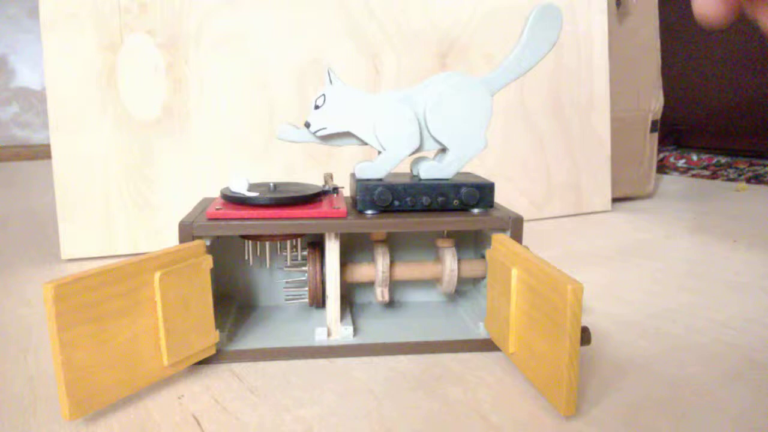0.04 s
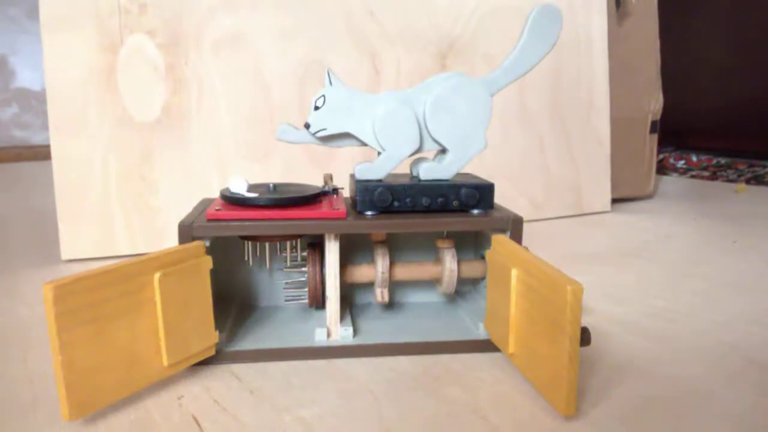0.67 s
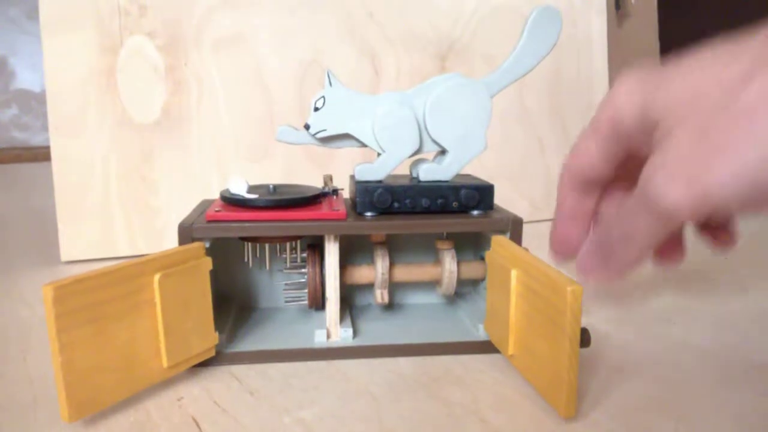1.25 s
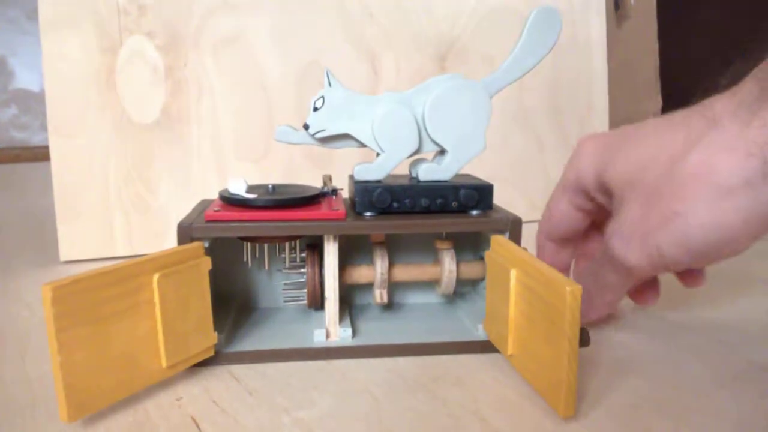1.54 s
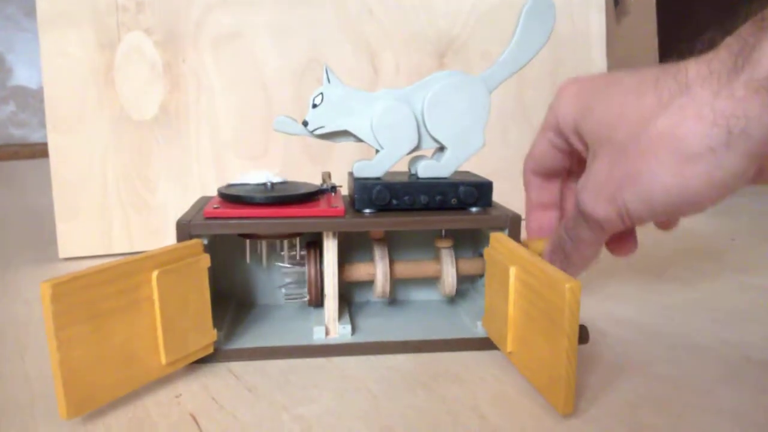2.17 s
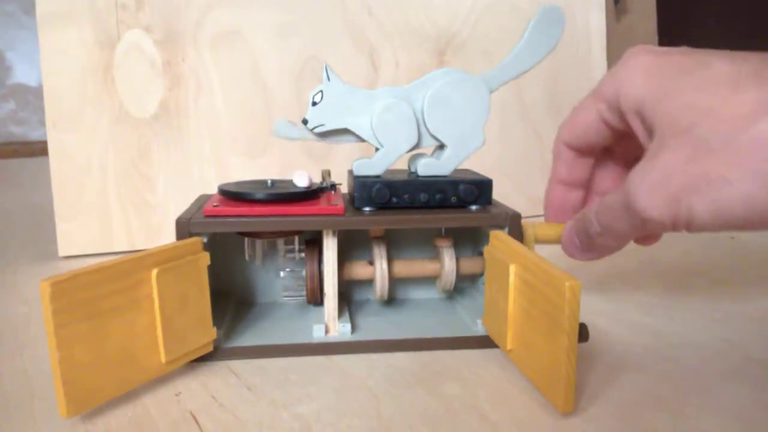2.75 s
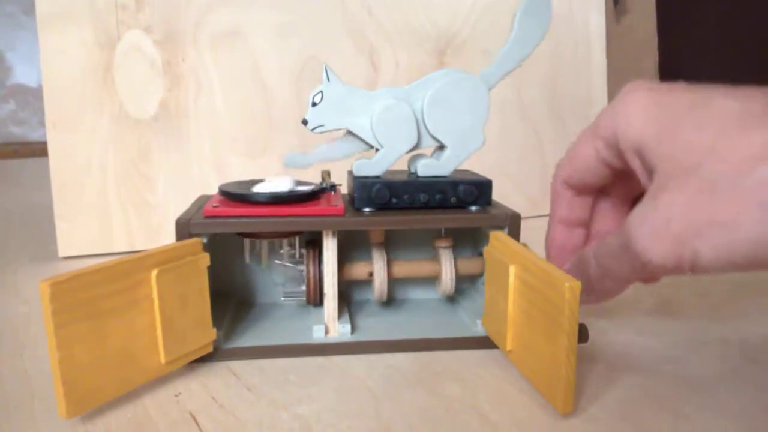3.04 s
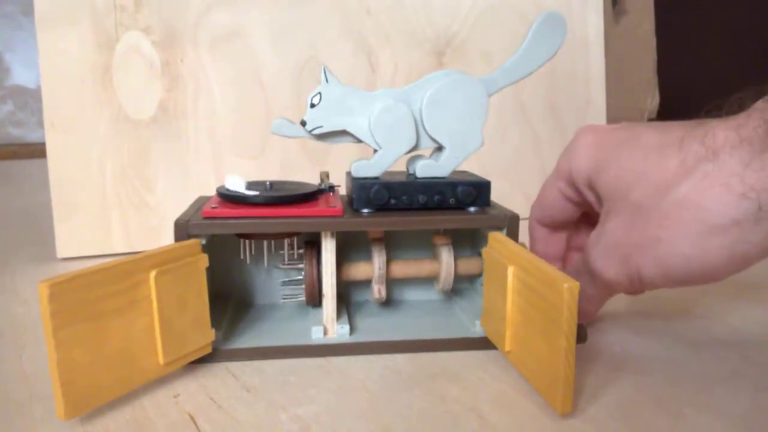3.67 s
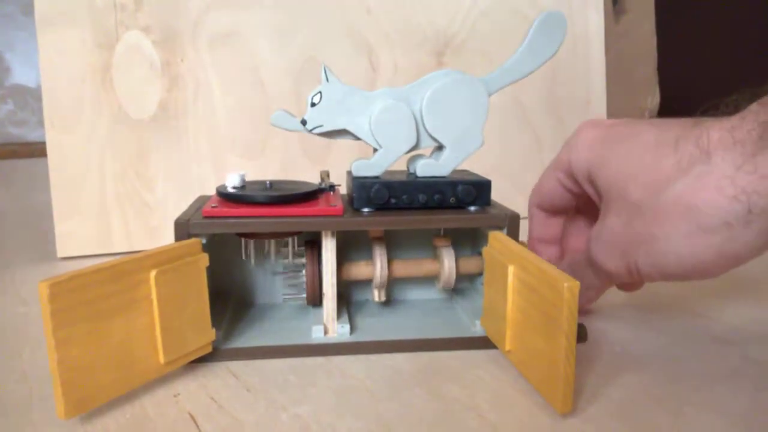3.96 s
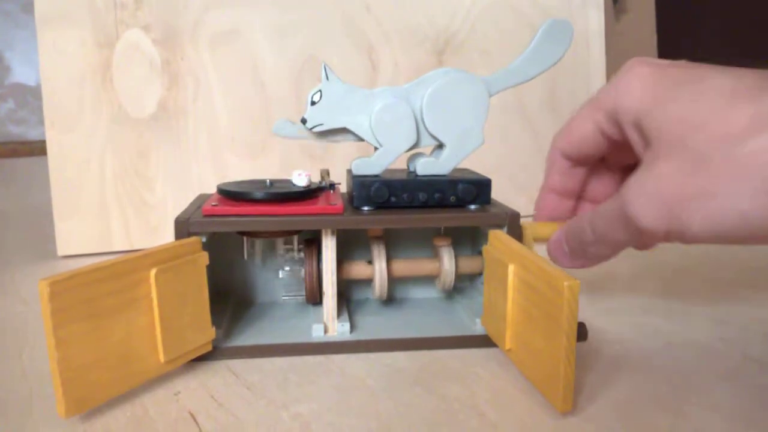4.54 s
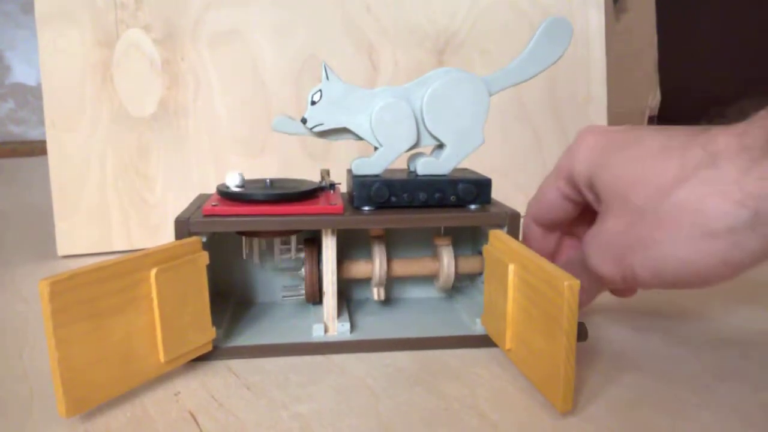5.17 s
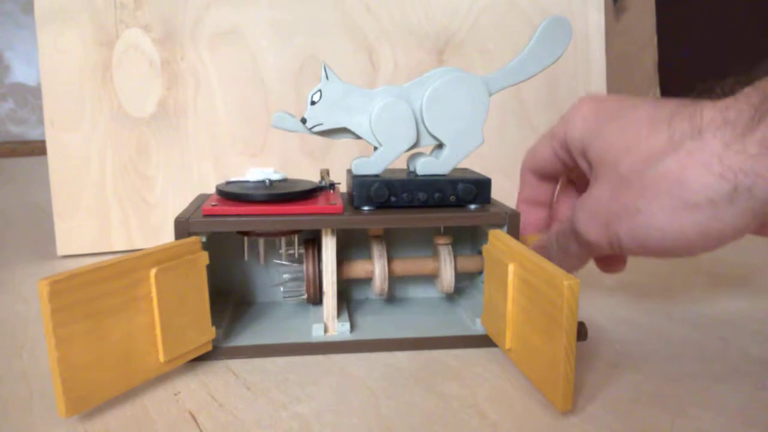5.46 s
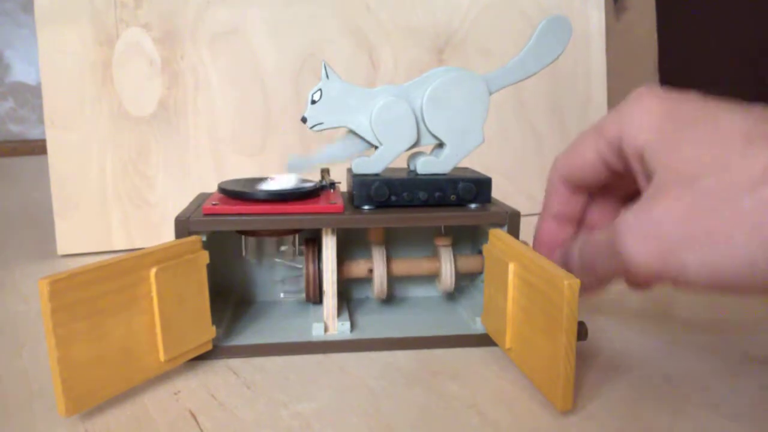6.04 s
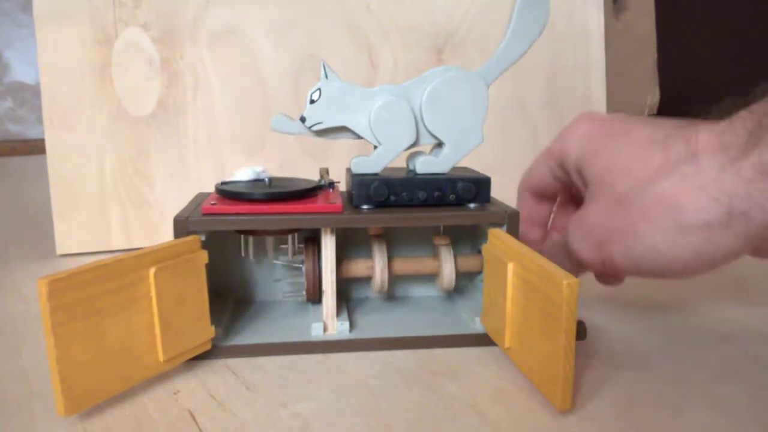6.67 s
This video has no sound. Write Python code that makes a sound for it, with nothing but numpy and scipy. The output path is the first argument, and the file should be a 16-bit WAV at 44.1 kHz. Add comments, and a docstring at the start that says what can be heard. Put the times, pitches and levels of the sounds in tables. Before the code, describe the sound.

A hand-cranked wooden toy grinds and rattles with small knocks and three sharp clacks in a quiet room.

```python
"""A wooden automaton is cranked by hand on a table in a small, quiet room.
Stick-slip friction makes its shaft grind and hiss, and its pins rattle, louder with greater effort.
Cams knock and scrape, exciting the damped modes of the open case; once a turn a cam lets the figure's
arm drop with a hard, bouncing clack. The table thuds softly and near surfaces add a short tail.
Faint room noise and a very faint, high double tick lie underneath."""
import sys
import numpy as np
from scipy import signal
from scipy.fft import rfft, irfft
from scipy.io import wavfile
from scipy.ndimage import uniform_filter1d

SR = 44100
rng = np.random.default_rng(int(sys.argv[2]) if len(sys.argv) > 2 else 0)


def store_pcm(level_fs):
    """Save levels as 16-bit WAV."""
    pcm = np.round(np.clip(level_fs, -1, 1) * 32767).astype(np.int16)
    wavfile.write(sys.argv[1], SR, np.atleast_2d(pcm).T)


N = 300321
T = np.arange(N) / SR
RING_T = T[:8192]  # time axis of one impact

# spectrum of the background noise (frequency [Hz], level [dB])
AIR_SPECTRUM = [(12, -37), (20, 1), (79, -9.5), (150, -21), (172, -24.5), (319, -22.5), (410, -28.5),
                (472, -23.5), (558, -29.5), (780, -28), (1370, -34), (5080, -32.5), (8890, -36.5),
                (11100, -37), (16000, -39.5)]
# effort on the crank, expressed as the level of the grinding (time [s], level [dB])
CRANK_EFFORT = [(1.62, -82), (1.86, -73), (2.03, -49), (2.44, -61), (2.67, -67), (2.76, -49.5),
                (2.9, -53.5), (3.3, -53), (3.56, -71), (3.74, -74.5), (3.91, -59.5), (4.03, -62.5),
                (4.12, -50), (4.4, -54), (4.5, -56.5), (4.7, -48), (4.86, -57), (5.07, -47.5),
                (5.15, -58.5), (5.39, -53.5), (5.53, -62.5), (5.68, -55), (6.01, -55.5), (6.26, -49),
                (6.47, -55), (6.68, -49.5), (6.81, -50)]
# modes of the wooden case (frequency [Hz], bandwidth [Hz], level [dB])
CASE_MODES = [(289.6, 97, -17.5), (440.3, 54, -2), (503.3, 87.6, -2), (575.5, 46, -6.5), (745, 72, -4),
              (842, 145.5, 0), (913.7, 92, 2), (1134, 320, -16), (1241, 80, -5), (1331.6, 36, -4),
              (1569, 53, -9), (1816, 34, -9), (1942, 104, -7.5), (2240, 134, -21.5)]
# modes of the small hard parts: wires, pins, arm (frequency [Hz], bandwidth [Hz], level [dB])
PART_MODES = [(2770, 160, -10.5), (3410, 160, -1), (3924, 100, -21), (3970, 140, -8), (4450, 130, 2),
              (4684, 180, -8), (6320, 570, -10.5), (7000, 58, -14)]
# spectrum of fine rubbing grit (frequency [Hz], level [dB])
GRIT_SPECTRUM = [(300, -11.5), (1700, 6.5), (2400, -3), (3900, 0.5), (5200, -9), (7000, -5.5), (8500, -17),
                 (11000, -10.5), (15000, -34.5)]
# a follower rides up its cam (time [s], duration [s], level [dB])
CAM_SCRAPES = [(1.634, .04, -63.5), (1.908, 0.307, -60.5), (2.315, 0.023, -63), (2.628, 0.02, -60),
               (2.755, 0.071, -52.5), (3.242, 0.038, -70.5), (4.11, 0.13, -60), (4.207, 0.16, -55),
               (4.364, 0.049, -45.5), (4.56, 0.069, -49), (4.68, 0.02, -47.5), (4.9, 0.048, -54.5),
               (5.097, 0.019, -67.5), (5.316, 0.084, -62), (5.668, 0.026, -54), (5.788, 0.022, -60.5),
               (5.864, 0.028, -53), (5.93, 0.03, -51), (6.044, 0.036, -55), (6.376, 0.073, -52),
               (6.642, 0.078, -55)]
# louder knocks of pins and cams (time [s], level [dB], nominal pitch [Hz], treble share [dB])
CAM_KNOCKS = [(1.634, -41.5, 910, -22), (1.663, -40, 885, -28), (1.684, -42, 960, -38),
              (1.793, -44.5, 940, -28), (2.008, -40.5, 835, -22), (2.093, -39.5, 945, -23),
              (2.179, -38.5, 890, -16), (2.495, -41.5, 820, -24), (2.71, -40, 900, -14.5),
              (2.866, -42, 800, -40), (2.936, -39, 910, -34), (3.106, -33, 995, -29.5),
              (3.18, -43, 850, -28), (3.268, -42, 1100, -29), (3.434, -47.5, 860, -21),
              (3.69, -52.5, 980, -18), (3.569, -52, 910, -25), (3.778, -34.5, 910, -16),
              (3.883, -46, 930, -35), (3.989, -45.5, 920, -22), (4.263, -41, 940, -33),
              (4.307, -41.5, 805, -12), (4.329, -29, 844, -24), (4.34, -32.5, 920, -22),
              (4.672, -35, 1660, -24.5), (4.787, -34, 955, -13), (4.818, -40, 840, -19),
              (4.899, -33.5, 896, -36), (5.067, -39.5, 1030, -48), (5.188, -36, 900, -26.5),
              (5.413, -39, 960, -33), (5.67, -38, 1040, -23), (5.682, -35, 840, -20),
              (6.039, -40, 815, -31), (6.246, -38.5, 840, -38), (6.303, -35.5, 1276, -20.5),
              (6.382, -31, 980, -23), (6.536, -34, 963, -33), (6.611, -39.5, 880, -10.5),
              (6.618, -31.5, 820, -41), (6.665, -34.5, 940, -21)]
# spectrum of the crack of a hard contact (frequency [Hz], level [dB])
CRACK_SPECTRUM = [(3000, -46), (4500, -7), (6000, -8.5), (8000, -5), (9500, -0.5), (10500, 6), (11600, 0.5),
                  (12800, -9), (13600, 1), (16000, -18.5)]
# spectrum of the dense, short ringing of the small parts (frequency [Hz], level [dB])
CLINK_SPECTRUM = [(900, -47.5), (1950, 5.5), (2400, -16.5), (2800, 0), (3300, -20), (3900, 6), (4650, 0.5),
                  (5300, -9), (7000, -2), (9000, -19)]
# dull bumps through the table (time [s], duration [s], level [dB])
TABLE_BUMPS = [(1.76, 0.087, -58.5), (3.53, 0.093, -51.5), (3.80, 0.079, -56), (6.095, 0.023, -53),
               (6.57, 0.076, -53)]
# spectrum of those bumps (frequency [Hz], level [dB])
BUMP_SPECTRUM = [(20, -21), (45, 1.5), (75, 3), (130, -8), (220, -22), (400, -48.5)]
# the arm slips off its cam, lands and bounces
# (time [s], level [dB], low-mode gain [dB], small-part ring [dB], crack [dB], chatter decay [s])
ARM_CLACKS = [(2.9802, -21.5, 7, -8.5, -18, 0.0034), (2.9959, -19, -9.5, -6.5, -8, 0.0022),
              (2.998, -26, -1, 1.5, -1, .001), (3.0275, -26, -9, -32, -16, 0.0049),
              (4.721, -21, -6, -3.5, -15.5, 0.0065), (4.744, -32.5, -19, -14, -12, .001),
              (4.749, -20, 0, -11, -11, 0.0029), (4.7756, -29, -8, -11.5, -16, 0.0009),
              (6.0856, -23, 14, -2, -11, 0.00053), (6.0976, -31.5, 9, -6, -7, 0.0022),
              (6.1076, -17.5, 4, -9, -4, 0.00075), (6.117, -23.5, 1.5, -26, -30, 0.0013)]
# reflected sound relative to direct sound (frequency [Hz], gain [dB])
ROOM_SPECTRUM = [(100, 15.5), (210, 6), (320, 3), (450, -5), (1000, -10.5), (2000, -7), (4500, -5.5),
                 (11000, -12), (16000, -19)]


def undb(db):
    """Amplitude ratio of a level in decibels."""
    return 10 ** (np.asarray(db) / 20)


def unit(x):
    """Normalisation to rms 1."""
    return x / np.sqrt(np.mean(x ** 2))


def burst(x):
    """Normalisation of a transient: its loudest 4 ms have rms 1."""
    return x / np.sqrt(uniform_filter1d(x ** 2, 176).max())


def steady(x):
    """Division by the running 60 ms rms evens the level and keeps the finer grain."""
    power = np.abs(uniform_filter1d(x ** 2, 2646))
    return x / np.sqrt(power + 0.0064 * np.mean(x ** 2))


def add(out, s, x):
    """Superposition of x onto out from time s on."""
    i = int(s * SR)
    out[i:i + len(x)] += x[:max(N - i, 0)]


def colour(x, spectrum):
    """Spectral weighting by (frequency [Hz], level [dB]) points."""
    hz, db = np.transpose(spectrum)
    f = np.maximum(np.fft.rfftfreq(len(x), 1 / SR), 1)
    gain = undb(np.interp(np.log(f), np.log(hz), db))
    return irfft(rfft(x) * gain, len(x))


def band(x, lo_hz, hi_hz, order):
    """Causal band-pass filtering."""
    return signal.sosfilt(signal.butter(order, [lo_hz, hi_hz], "band", fs=SR, output="sos"), x)


def through(x, response):
    """Convolution with an impulse response."""
    return signal.fftconvolve(x, response)[:len(x)]


def walk(rate):
    """Interpolated random fluctuation with a spread near 1."""
    steps = rng.standard_normal(int(N / SR * rate) + 2)
    return 1.056 * np.interp(T * rate, np.arange(len(steps)), steps)


def swells(rows, edge_s):
    """Trapezoidal envelopes from (time [s], duration [s], level [dB]) rows."""
    return sum(undb(db) * np.clip(np.minimum(T - s, s + length - T) / edge_s + .5, 0, 1)
               for s, length, db in rows)


def fading_noise(decay_s):
    """Noise under exponential decay."""
    return rng.standard_normal(len(RING_T)) * np.exp(-RING_T / decay_s)


def air():
    """Broadband noise: faint room rumble and hiss."""
    return undb(-64.5) * unit(colour(rng.standard_normal(N), AIR_SPECTRUM))


def ticking(hz, width_s, period_s):
    """Gaussian tone pulses in periodic pairs make a very faint, high double tick."""
    since = (T - .47) % period_s
    pair = [(since - .0185, -55), (since - .034, -57)]
    return sum(undb(db) * np.exp(-(t / width_s) ** 2) * np.sin(2 * np.pi * hz * t) for t, db in pair)


def ring(modes, scatter_db, low_db=0):
    """Modal superposition: each point of contact weights the damped modes anew and detunes them."""
    hz, width, db = np.transpose(modes)
    weight, detune = rng.standard_normal((2, len(hz)))
    db = db + scatter_db * weight + low_db * (hz < 650)
    amplitude = (-1) ** np.arange(len(hz)) * undb(db) * width
    hz = hz + .15 * width * detune
    decay = np.exp(-np.pi * np.outer(width, RING_T))
    return amplitude @ (decay * np.sin(2 * np.pi * np.outer(hz, RING_T)))


def tock(hz, rise_s):
    """Heavy damping: a small wooden part swells for a cycle or two and stops."""
    t = RING_T / rise_s
    return burst(t ** 2 * np.exp(-2 * t) * np.sin(2 * np.pi * hz * RING_T))


def slips(rate, spread_db):
    """Stick-slip motion: a random train of tiny releases of uneven size."""
    released = rng.random(N) < rate / SR
    size = undb(spread_db * np.clip(rng.standard_normal(N), -2, 2))
    return released * size * rng.choice([-1, 1], N)


def grinding():
    """Coarse stick-slip drives the case modes; the load wanders among four points of contact."""
    out = np.zeros(N)
    for _ in range(4):
        case = burst(ring(CASE_MODES, scatter_db=2, low_db=2.5))
        response = case + tock(rng.uniform(626, 1256), rise_s=0.00085)
        out += through(slips(rate=120, spread_db=5.5), response) * undb(3.8 * walk(14))
    return steady(out)


def shaft(hiss):
    """Sliding friction follows the effort and dips while a pin flies free before each listed knock."""
    flights = [(s - .028, .028, 0) for s, *_ in CAM_KNOCKS]
    in_flight = np.minimum(swells(flights, edge_s=0.0052), 1)
    return undb(effort(T) - 6 * in_flight) * (grinding() + undb(-17) * hiss)


def effort(s):
    """Friction level in dB at time s; nothing turns before the hand takes hold."""
    return np.interp(s, *np.transpose(CRANK_EFFORT), left=-120)


def scrapes(fine_slips, hiss, judder_hz=58.3, release_s=0.0066):
    """Amplitude modulation by stick-slip: a follower judders up its cam, less so when pressed hard."""
    judder = np.sin(2 * np.pi * np.cumsum(judder_hz * (1 + 0.255 * walk(30))) / SR)
    pressure = np.zeros(N)
    for s, length_s, db in CAM_SCRAPES:
        attack = np.clip((T - s) / (.2 * length_s) + 0.33, 0, 1)
        release = np.exp(-np.clip((T - s - length_s) / release_s, 0, 20))
        depth = np.clip(0.54 - 0.3 * (db + 54), 0, 1)
        pressure += undb(db) * attack * release * (1 + depth * judder)
    case = steady(through(fine_slips, ring(CASE_MODES, scatter_db=4)))
    return pressure * (hiss + undb(1) * case)


def friction():
    """Dry friction of wood on wood: dense, fine slips give shaft and followers a common hiss."""
    fine_slips = slips(rate=3500, spread_db=4.5) * undb(2.5 * walk(150))
    parts = unit(through(fine_slips, ring(PART_MODES, scatter_db=2.5)))
    grit = unit(colour(fine_slips, GRIT_SPECTRUM))
    hiss = steady(undb(-16) * parts + grit)
    return shaft(hiss) + scrapes(fine_slips, hiss)


def chatter(decay_s, share):
    """Contact force: one impulse followed by a spray of tiny recontacts."""
    spray = fading_noise(decay_s)
    force = share * spray / np.linalg.norm(spray)
    force[0] += 1
    return force


def snap(spectrum, decay_s, rise_s):
    """Modal overlap: many short modes merge into noise that builds while the faces meet, then dies."""
    envelope = np.exp(-RING_T / decay_s) * (1 - np.exp(-RING_T / rise_s)) ** 2
    return burst(colour(rng.standard_normal(len(RING_T)), spectrum) * envelope)


def wire(hz, decay_s):
    """Free vibration of one damped mode of a short steel pin or rod."""
    return burst(np.sin(2 * np.pi * hz * RING_T) * np.exp(-RING_T / decay_s))


def clink(decay_s, rise_s, clear_db):
    """Resonance of the small parts: a few clear modes stand among many dense, short ones."""
    clear = burst(through(chatter(0.0025, share=0.16), ring(PART_MODES, scatter_db=13)))
    return burst(undb(clear_db) * clear + snap(CLINK_SPECTRUM, decay_s, rise_s))


def knock(nominal_hz, hard_db):
    """Impact of a pin or cam on the case: harder contact gives more crack and small-part ringing."""
    case = burst(through(chatter(.0012, share=.5), ring(CASE_MODES, scatter_db=2.5, low_db=-2)))
    wood = burst(tock(nominal_hz * 1.04, rise_s=.0017) + undb(-4) * case)
    crack = snap(CRACK_SPECTRUM, decay_s=0.0065, rise_s=0.001)
    pin = undb(-6) * wire(rng.uniform(12500, 15500), decay_s=.007)
    parts = undb(2) * clink(decay_s=0.0033, rise_s=0.002, clear_db=0.5)
    return wood + undb(hard_db) * (crack + pin + parts)


def knocks():
    """Backlash: cams and pins take up their slack with distinct knocks."""
    out = np.zeros(N)
    for s, db, nominal_hz, hard_db in CAM_KNOCKS:
        add(out, s, undb(db) * knock(nominal_hz, hard_db))
    return out


def rattle(count=76, median_gap_s=1 / 12, spread_octaves=0.29):
    """Random impacts: the gear pins tap at uneven intervals, louder the harder the crank is pushed."""
    out = np.zeros(N)
    s = CRANK_EFFORT[0][0]
    for gap, size, pitch in rng.standard_normal((count, 3)):
        s += median_gap_s * np.exp(.5 * gap)
        tap = knock(950 * 2 ** (spread_octaves * pitch), hard_db=-18.5)
        add(out, s, undb(effort(s) + 4.5 + 2 * size) * tap)
    return out


def bumps():
    """Structure-borne sound: the hand jostles the toy and the table answers with soft thuds."""
    return swells(TABLE_BUMPS, edge_s=0.033) * unit(colour(rng.standard_normal(N), BUMP_SPECTRUM))


def clacks():
    """Impact and rebound: the falling arm excites case, small parts and a sharp crack together."""
    out = np.zeros(N)
    for s, db, low_db, parts_db, crack_db, chatter_s in ARM_CLACKS:
        force = chatter(chatter_s, share=0.66)
        case = burst(through(force, ring(CASE_MODES, scatter_db=0.5, low_db=low_db)))
        slap = burst(band(fading_noise(0.0057), 538, 1870, order=4))
        wood = burst(tock(1035, rise_s=0.00096) + undb(-4.5) * slap + undb(-1.5) * case)
        parts = undb(parts_db) * clink(decay_s=0.0091, rise_s=0.00014, clear_db=1)
        # only a square hit sets the push rod singing in two bending modes
        bending = wire(3938, decay_s=.012) + undb(-12) * wire(11170, decay_s=.012)
        rod = undb(min(4 * parts_db, -10)) * bending
        crack = undb(crack_db) * snap(CRACK_SPECTRUM, decay_s=0.0062, rise_s=0.3 * chatter_s)
        add(out, s, undb(db) * (wood + parts + rod + crack))
    return out


def room(x, t60_s, gap_s):
    """Reverberation: table, backboard and near walls return a short, dense tail."""
    t = T[:SR // 2]
    onset = np.clip(t / gap_s - .5, 0, 1)
    tail = rng.standard_normal(len(t)) * np.exp(-np.log(1000) * t / t60_s) * onset
    response = colour(tail / np.linalg.norm(tail), ROOM_SPECTRUM)[:SR // 3]
    return x + through(x, response)


def scene():
    """Superposition of toy and background; the toy carries little sound below about 190 Hz."""
    toy = band(clacks() + knocks() + friction() + rattle(), 190, 19000, order=3)
    toy = room(toy, t60_s=0.2, gap_s=0.0037)
    ticks = ticking(hz=11300, width_s=.00035, period_s=.32)
    return (toy + bumps() + air() + ticks)[None]


def record(dry):
    """Fade-in and band limiting: the sound rises from silence and is cut steeply above 16.1 kHz."""
    fade_in = np.interp(T, [.31, .5], [0, 1])
    low_pass = signal.ellip(10, .2, 70, 16100, fs=SR, output="sos")
    return signal.sosfilt(low_pass, dry * fade_in)


dry = scene()
out = record(dry)
store_pcm(out)
```